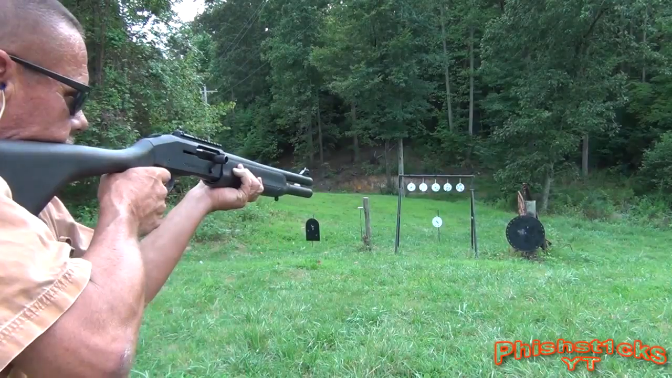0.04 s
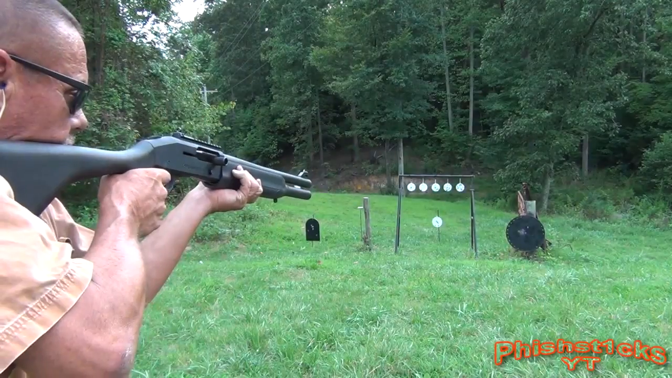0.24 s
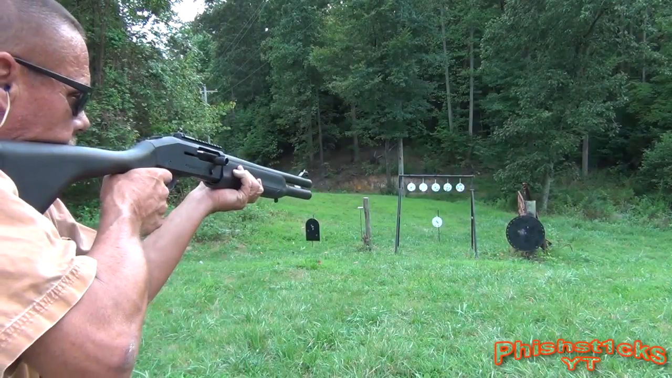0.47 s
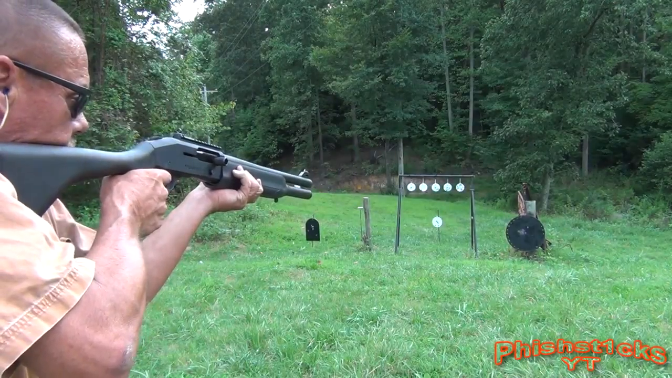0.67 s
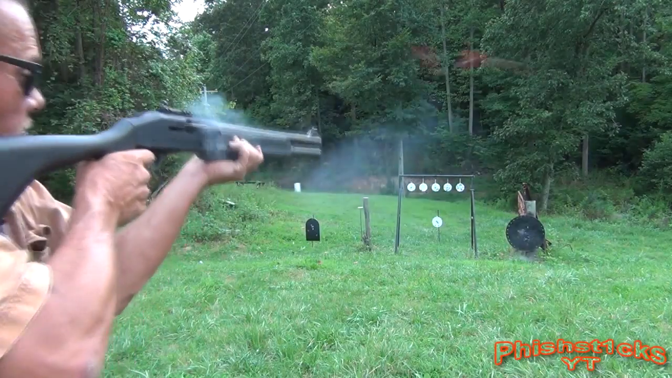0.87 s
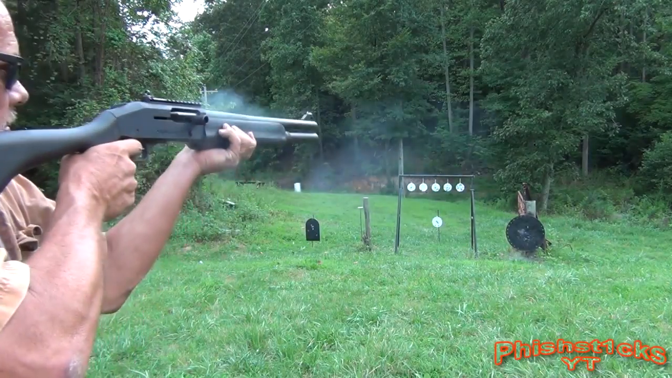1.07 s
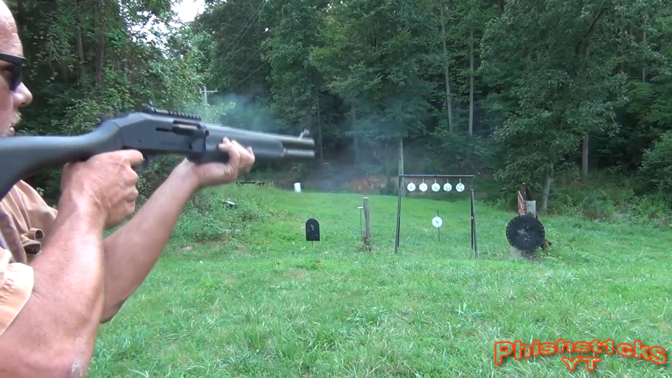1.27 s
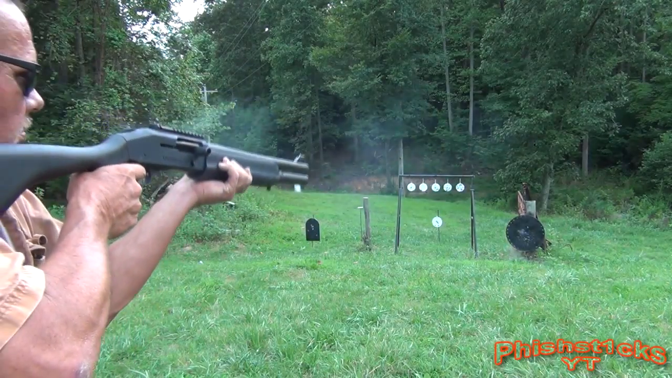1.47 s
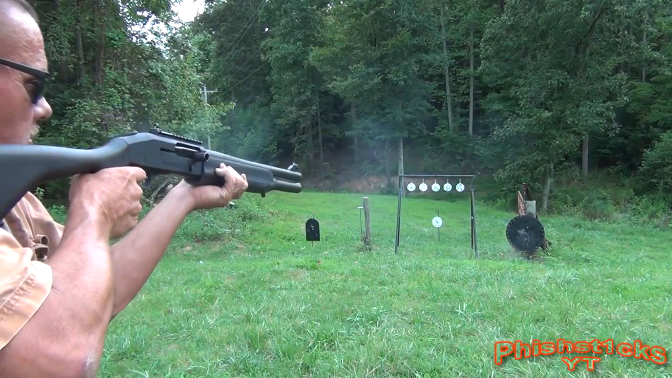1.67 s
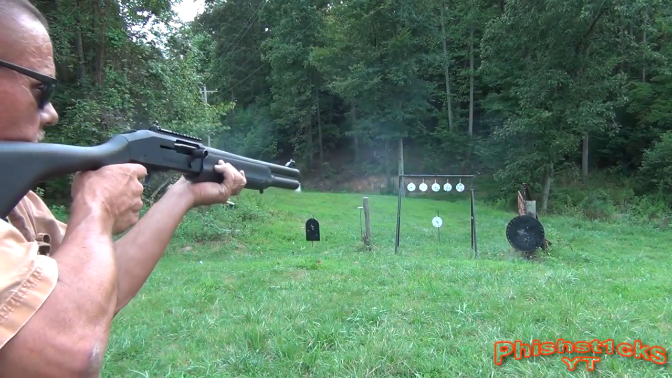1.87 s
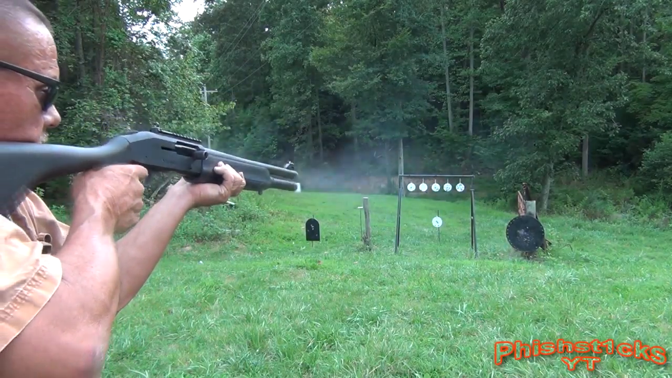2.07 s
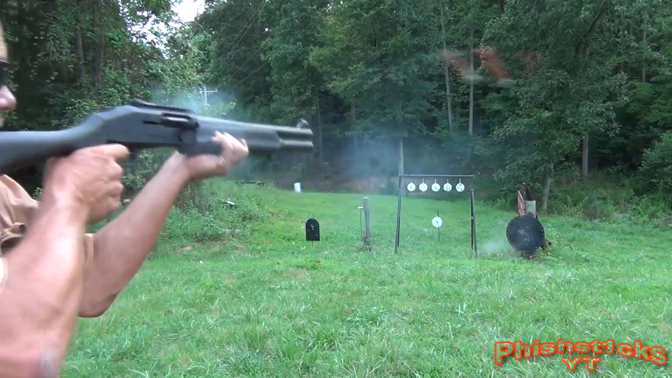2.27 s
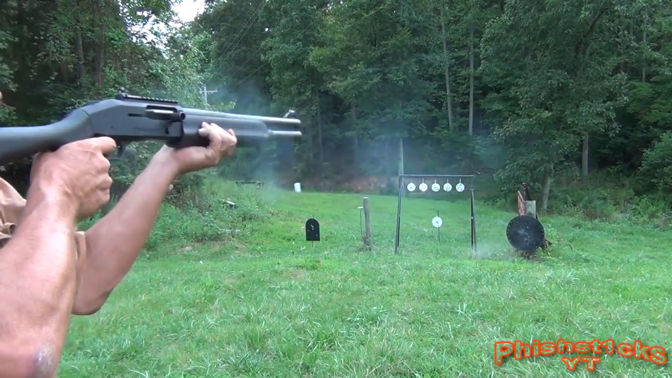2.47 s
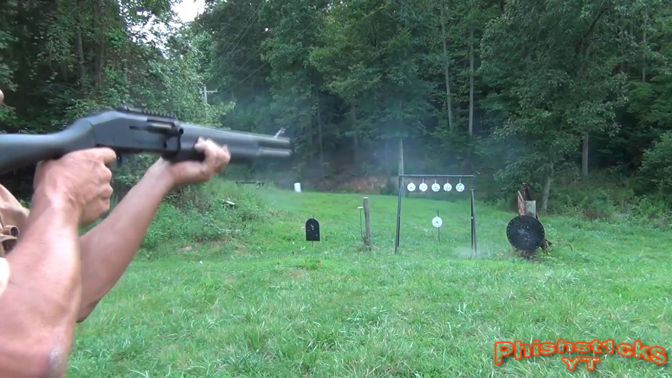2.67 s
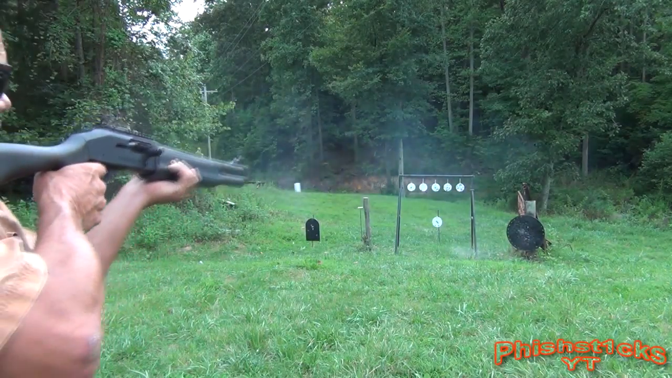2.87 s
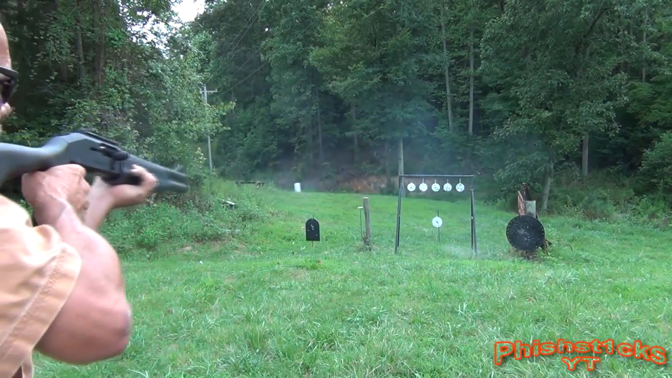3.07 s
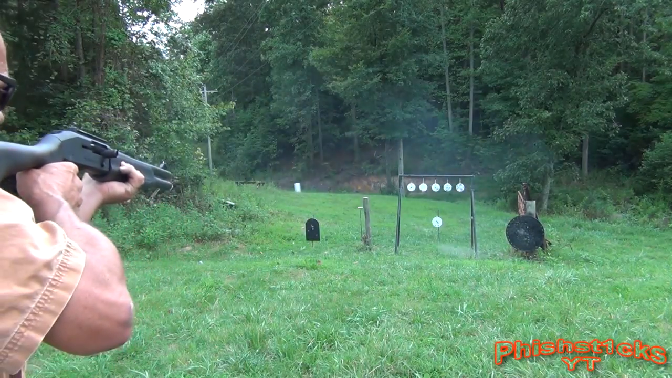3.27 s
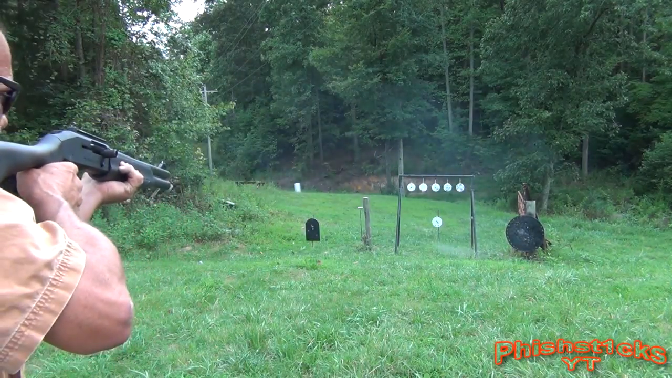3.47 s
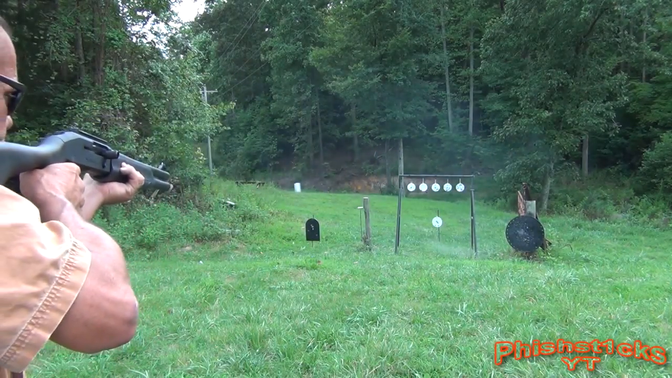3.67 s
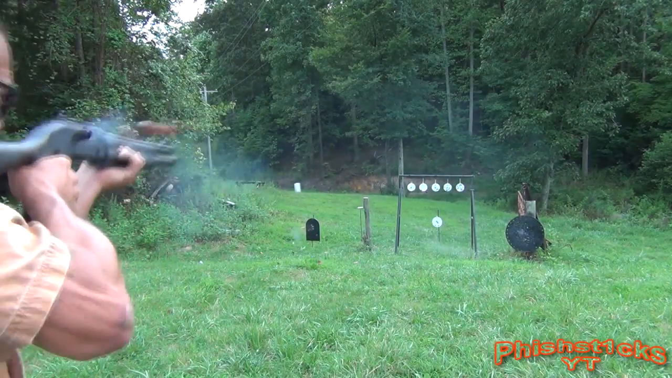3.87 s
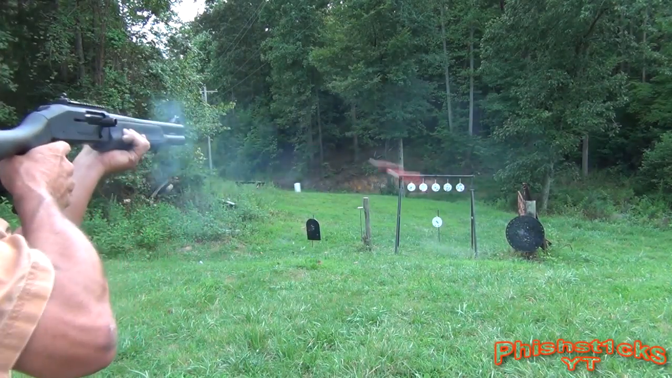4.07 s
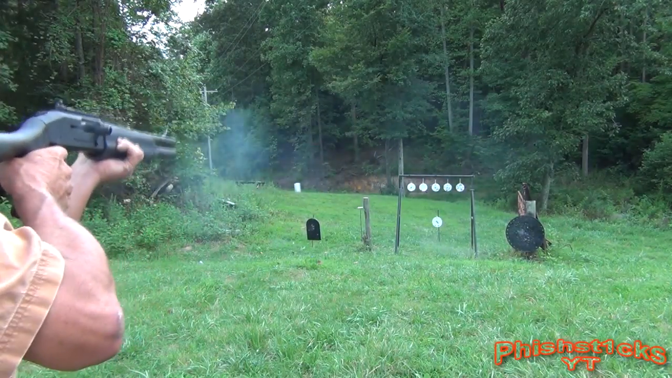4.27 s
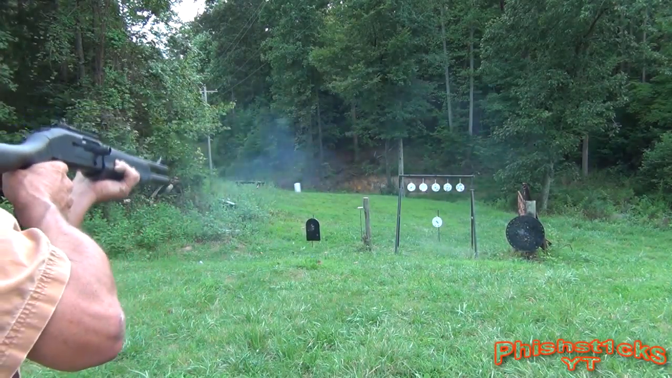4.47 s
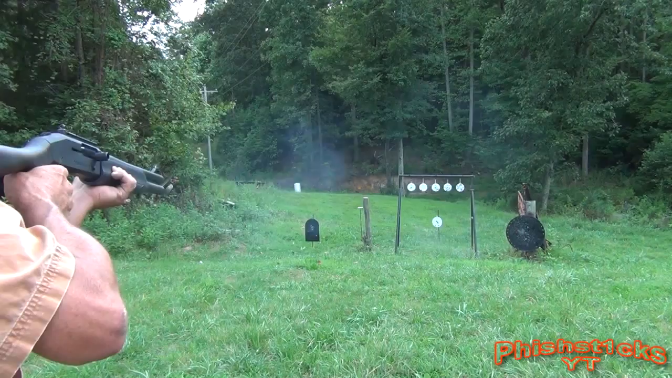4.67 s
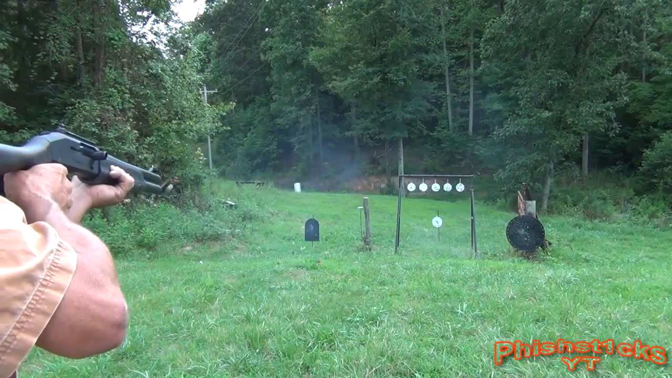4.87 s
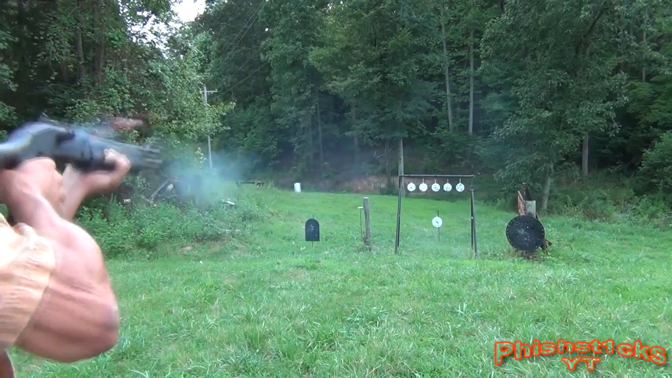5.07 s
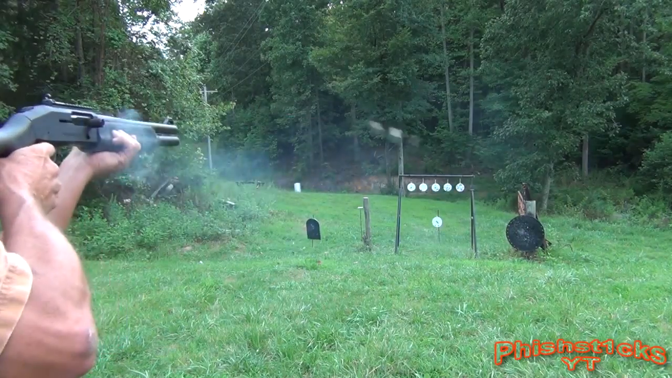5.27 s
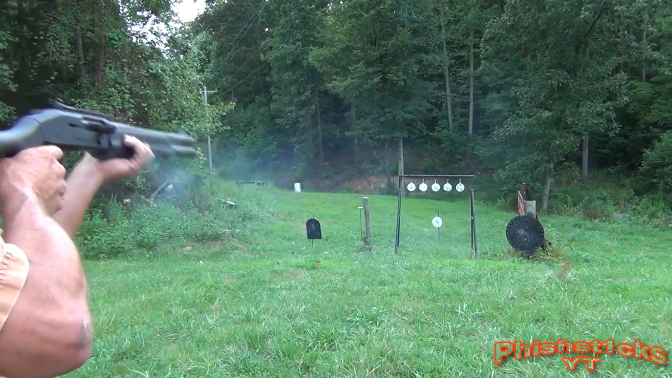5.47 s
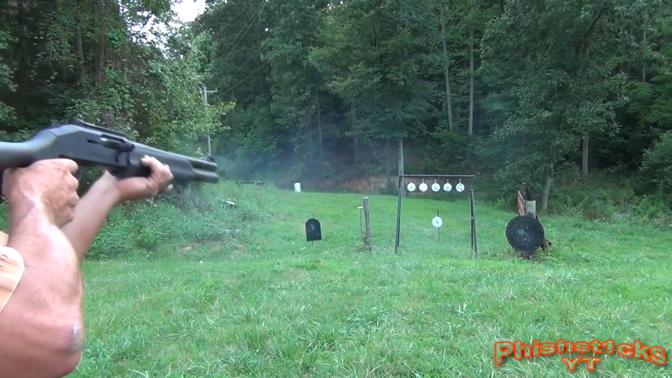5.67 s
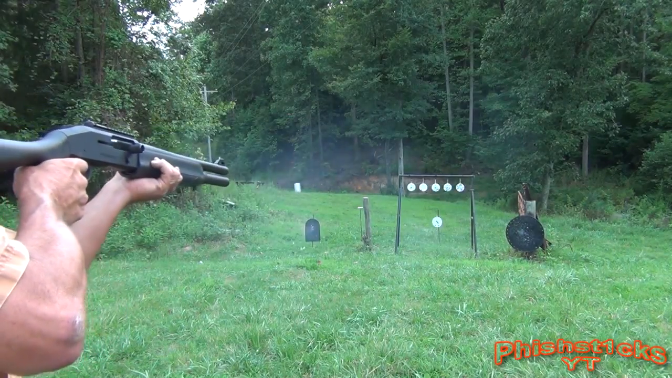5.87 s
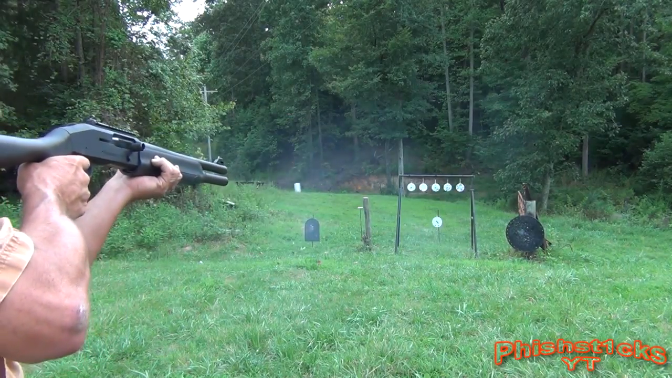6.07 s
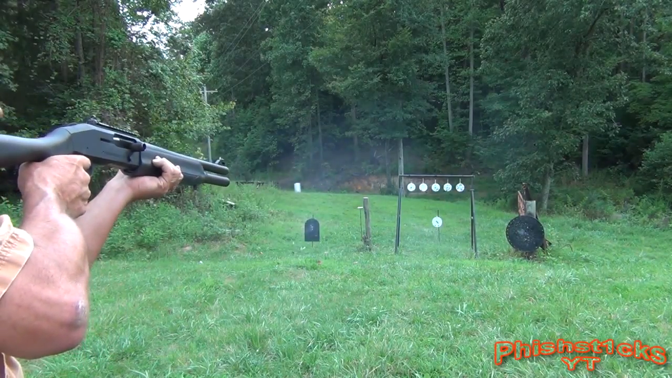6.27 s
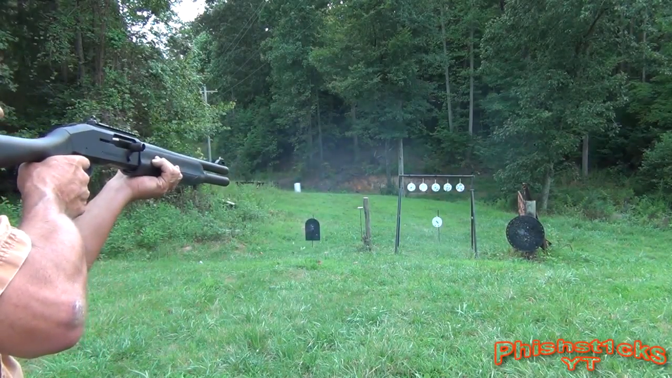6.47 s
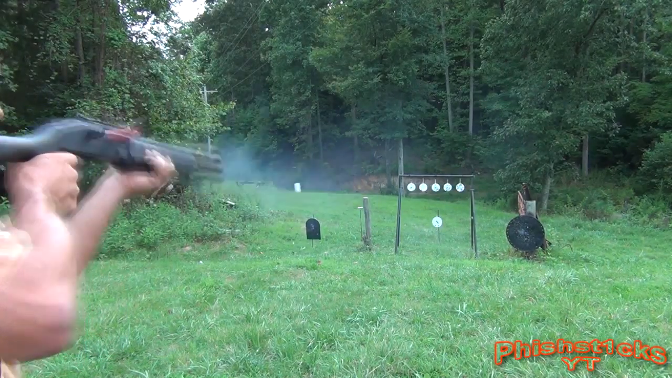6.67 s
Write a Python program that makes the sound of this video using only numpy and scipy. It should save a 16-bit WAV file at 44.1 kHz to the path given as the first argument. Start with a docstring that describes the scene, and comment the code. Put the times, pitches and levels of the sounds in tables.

```python
"""Four shotgun shots at steel targets in a clearing: filtered noise bursts, each after a faint hammer fall.
Lead slaps a plate (short noise) and the plate rings (fluttering sines and comb-filtered noise).
Trees return hard echoes (noise puffs) and a long roll (noise losing treble with delay).
Action clacks are short noise; leaves hiss and insects sing in pulsing noise bands behind.
Automatic gain ducks at loud sounds and creeps back."""
import sys
import numpy as np
from scipy import signal
from scipy.fft import rfft, irfft, next_fast_len
from scipy.io import wavfile
from scipy.ndimage import uniform_filter1d

SR = 44100
rng = np.random.default_rng(int(sys.argv[2]) if len(sys.argv) > 2 else 0)


def wav_record(signal):
    """Record a signal, one row per channel, as 16-bit PCM in the file named by sys.argv[1]."""
    frames = np.transpose(np.atleast_2d(signal))
    bounded = np.clip(frames, -1, 1)
    # unit amplitude maps onto the largest positive 16-bit level
    quanta = np.round(bounded * 32767).astype(np.int16)
    wavfile.write(sys.argv[1], SR, quanta)


N = 297234

# Levels are ahead of the gain control; spectra are levels per Hz unless noted.
# shots: t/s, blast level/dB, near scatter level/dB, woods level/dB, target (0 round plate, 1 small plate)
SHOTS = [(0.801, 5, -4, -2, 0), (2.176, 5.1, -5, -3.5, 0), (3.9023, 4.2, -8.5, -7.5, 1),
         (5.12, 4, -9, -11, 1)]
# muzzle blast spectrum: f/Hz, level/dB
BLAST_SPECTRUM = [(25, -24), (45, -22), (100, -22), (250, -4), (500, -2), (1200, 1.5), (2500, -1),
                  (5000, -3), (9000, -1.5), (13000, -4), (16000, -15)]
# large reflectors: delay/s, level/dB aiming at round plate, level/dB aiming at small plate
ECHOES = [(0.0733, 9, 7.5), (0.0803, 8, 0.5), (.1805, 10, 0), (0.2541, 12, 7), (0.2689, 4, 5.5),
          (0.286, 4, -5), (.3266, 11, -1), (.342, 12, 7.5), (0.3602, 5.5, 4.5), (0.3844, 6, -4),
          (0.4343, 3, 1.5)]
# dull thud of a hard echo: f/Hz, level/dB
ECHO_SPECTRUM = [(25, -39), (60, -34.5), (120, -17.5), (250, -9), (450, -5), (800, 0.5), (1150, -2.5),
                 (1700, -10.5), (3000, -14.5), (6000, -28), (16000, -51)]
# grass and near trees, also the bright part of a hard echo: f/Hz, level/dB
NEAR_SPECTRUM = [(25, -33), (45, -24.5), (100, -17.5), (250, -2), (500, 1.5), (1100, 4), (2000, 3.5),
                 (4000, 0), (8000, -3.5), (12000, -8), (16000, -25)]
# deep woods: f/Hz, level/dB
WOODS_SPECTRUM = [(25, -43), (50, -34.5), (90, -25), (160, -22.5), (260, -13.5), (370, 0.5), (500, 6.5),
                  (650, -0.5), (950, 1), (1300, -1), (1700, -2), (3000, -7), (5000, -14), (9000, -22),
                  (15000, -44)]
# air absorption: f/Hz, loss/(dB per s of travel)
AIR_LOSS = [(40, 18.5), (120, 12), (300, -4.5), (450, -2.5), (1000, 0), (2000, 9.5), (4000, 22.5),
            (8000, 37.5), (16000, 65)]
# wooded bank behind the round plate, before its pitch shift: f/Hz, level/dB
SURGE_SPECTRUM = [(30, -42.5), (150, -30.5), (350, -13.5), (600, 0.5), (820, 7.5), (1050, 0.5), (1400, -10),
                  (2500, -16), (6000, -28.5), (16000, -51.5)]
# scattered sound of near trees, woods, bank: level/dB, full level at delay/s, rise/s, held until delay/s,
# sag/(dB per s), fall/(dB per s)
NEAR_SWELL = (3, .086, .018, .26, 27, 105)
WOODS_SWELL = (-0.27, 0.2877, .06, 0.45, 1, 30)
SURGE_SWELL = (-2.5, .305, 0.3, 0.4, 3.5, 125)
# lead on the plates: t/s, level/dB, fade time constant/s
SLAPS = [(.877, 10.5, 0.0028), (2.25, 9.5, .004), (3.9836, 9.5, 0.0047), (5.2035, 10, 0.0044)]
# action clacks and ticks: t/s, level/dB, fade time constant/s
CLACKS = [(.931, 3, .005), (1.597, -38.5, .002), (2.309, 7.5, 0.0064), (2.945, -36, 0.0022),
          (3.306, -44, .002), (4.025, 1, 0.0054), (5.246, 0, 0.0048)]
# slaps and clacks: f/Hz, level/dB
METAL_SPECTRUM = [(100, -26), (1000, -10.5), (3000, -0.5), (6000, -7), (8500, -1), (12000, -4.5),
                  (16000, -16)]
# round plate modes: f/Hz, level/dB, t60/s
ROUND_PLATE = [(187.3, -26, 3.14), (9200, -27.5, .5), (11200, -19, .6), (12600, -21, .5)]
# small plate modes, struck at two spots: f/Hz, level/dB first hit, level/dB second hit
SMALL_PLATE = [(4480, -23, -31), (5103, -28, -21), (5523, -23, -20), (5922, -24, -17), (6288, -26, -18),
               (6714, -17, -9), (6799, -15, -20), (6853, -22, -15), (7211, -26, -21), (7378, -26, -20),
               (7660, -16, -23), (7773, -16, -20), (8008, -20, -21), (8560, -21, -21), (8845, -18, -23),
               (9408, -8, -18), (10363, -19, -25), (10490, -18, -19), (10750, -21, -23), (11133, -21, -25),
               (11420, -14, -14), (11620, -17, -23), (13700, -26, -28)]
# small plate swing per hit, values at RING_HZ: ring level/dB, facing level/dB, facing delay/s,
# sweep width (Gaussian sigma)/s, decay/(dB per s)
SWINGS = [(-4, 4.5, .078, .057, 42), (-7, 4.5, 0.092, 0.032, 56)]
# earlier sweep of high modes, which beam narrowly, one per hit: lead/(s per octave above RING_HZ)
BEAM_LEADS = [.02, 0.055]
# side signal against mid: f/Hz, level/dB
WIDTH = [(60, -30), (150, -34.5), (350, -32.5), (700, -16.5), (1400, -15), (3000, -13), (6000, -11.5),
         (11000, -21), (15000, -30.5)]
# breeze in the leaves: f/Hz, level/dB
LEAVES_SPECTRUM = [(18, -47.5), (30, -20), (145, -4.5), (184, -12.5), (364, 0), (822, 1), (1160, -2.5),
                   (2900, -13), (3770, -12), (4530, -15.5), (5170, -15.5), (7270, -8), (9460, -17.5),
                   (14800, -16.5), (16000, -22.5)]
# insects: start t/s, end t/s, f/Hz, width/Hz, level/dB, pulses/(per s), pulse depth (0-1)
INSECTS = [(0, 2.4, 5193, 130.1, -74, 62, 0.9), (0, 6.74, 5850, 40, -74, 3.2, .9),
           (0, 6.74, 7120, 756, -71, .6, 0.2), (5.8, 6.5, 4590, 22, -75, 3.3, 0.4)]

TAIL_SAMPLES = 110250
# hard echo: smear grows with delay; bright splinter against thud
SMEAR_START_S, SMEAR_S_PER_S, SPLINTER_DB = 0.0008, 0.0017, -18
# echoes from single trunks
TRUNK_COUNT, TRUNKS_FROM_S, TRUNKS_TO_S = 12, 0.095, 0.46
TRUNK_DB, TRUNK_SPREAD_DB = -3.5, 2
EARLY_DB = -28  # scattered sound before its rise, against full level
# bank roar: start pitch shift, then sinking between two delays
SURGE_START_OCT, SURGE_SAG_OCT_PER_S = 0.23, 7.3
SURGE_SAG_FROM_S, SURGE_SAG_TO_S = 0.31, 0.414
# small plate: reference pitch, decay-rate exponent, facing swell tilt, added damping of the hanger
RING_HZ, FALL_POWER, BEAM_DB_PER_OCT = 8500, 0.3, 3
RING_DAMPED_S, DAMPED_DB_PER_S = 0.57, 69
AIR_START_DB, AIR_DB_PER_S = -57.5, -0.24
EDGE_HZ = 16300


def gun():
    """Each shot sends out a blast and scattered returns; shots aimed alike wake the same echoes."""
    out, t = np.zeros((2, N)), np.arange(SR) / SR
    fields = [(hard_echoes(target), woods()) for target in (0, 1)]
    bank = surge()
    for s, blast_db, near_db, woods_db, target in SHOTS:
        lock_time_s, bang = blast()
        echoes, roll = fields[round(target)]
        near = colour(noise(SR, lumpy_db=1.5), NEAR_SPECTRUM) * swell(t, *NEAR_SWELL)
        add(out, s - lock_time_s, amp(blast_db) * bang)
        add(out, s, amp(near_db) * near)
        add(out, s, (1 - round(target)) * bank)  # round plate only
        add(out, s, echoes + amp(woods_db) * roll)
    return out


def blast(t60_s=0.5, rise_s=0.00023, hammer_db=-23, lock_time_s=0.006):
    """The hammer falls, then, lock_time_s later, the muzzle blast tears out as decaying noise."""
    t = np.arange(SR // 2) / SR
    out = np.zeros((2, len(t)))
    add(out, 0, amp(hammer_db) * burst(0.0025))
    envelope = (1 - np.exp(-t / rise_s)) * amp(-60 * t / t60_s)
    add(out, lock_time_s, noise(len(t), lumpy_db=-1.5) * envelope)
    return lock_time_s, colour(out, BLAST_SPECTRUM)


def hard_echoes(target, size=2048, energy_s=0.002, bass_hz=240, bass_db=-6):
    """Large reflectors and single trunks each return a dull thud with a little bright splinter."""
    out, t = np.zeros((2, TAIL_SAMPLES)), np.arange(size) / SR
    place, strength = rng.random((TRUNK_COUNT, 2)).T
    delays = TRUNKS_FROM_S + (TRUNKS_TO_S - TRUNKS_FROM_S) * (np.arange(TRUNK_COUNT) + place) / TRUNK_COUNT
    trunks = list(zip(delays, TRUNK_DB + TRUNK_SPREAD_DB * (2 * strength - 1)))
    large = [(delay, small_db if target else round_db) for delay, round_db, small_db in ECHOES]
    puff_gain = np.sqrt(energy_s * SR / size)  # thud energy: that of rms-1 noise lasting energy_s
    for delay, db in large + trunks:
        puff = t * np.exp(-t / (SMEAR_START_S + SMEAR_S_PER_S * delay))
        thud = unit(colour(noise(size) * puff, ECHO_SPECTRUM))
        splinter = unit(colour(noise(size) * puff, NEAR_SPECTRUM))
        add(out, delay, amp(db) * puff_gain * (thud + amp(SPLINTER_DB) * splinter))
    bass_cut = signal.butter(N=2, Wn=bass_hz, btype="high", fs=SR)
    body = signal.lfilter(*bass_cut, out)
    return body + amp(bass_db) * (out - body)  # long waves mostly pass round the reflectors


def woods(tree_line_s=0.33, lumpy_db=0.5, blend_s=0.96):
    """Countless trunks scatter the blast; longer paths give a smoother roll and lose more treble to the air."""
    delay = np.arange(TAIL_SAMPLES) / SR
    lumps_db = lumpy_db * np.exp(-np.maximum(delay - tree_line_s, 0) / blend_s)
    hz, t, z = signal.stft(noise(TAIL_SAMPLES, lumps_db), SR, nperseg=512)
    z = z * amp(-at_hz(AIR_LOSS, hz)[:, None] * np.maximum(t - tree_line_s, 0))
    roll = signal.istft(z, SR, nperseg=512)[1][:, :TAIL_SAMPLES]
    return colour(roll, WOODS_SPECTRUM) * swell(delay, *WOODS_SWELL)


def surge(lumpy_db=4):
    """The wooded bank returns a dense roar whose pitch sinks as deeper ranks of trees answer."""
    hz, t, z = signal.stft(noise(SR, lumpy_db), SR, nperseg=512)
    sag_s = np.clip(t - SURGE_SAG_FROM_S, 0, SURGE_SAG_TO_S - SURGE_SAG_FROM_S)
    octaves = SURGE_START_OCT - SURGE_SAG_OCT_PER_S * sag_s
    tone = amp(at_hz(SURGE_SPECTRUM, hz[:, None] / 2 ** octaves))
    tone = tone / np.sqrt(np.mean(tone ** 2, axis=0))
    roar = signal.istft(z * tone, SR, nperseg=512)[1][:, :SR]
    return roar * swell(np.arange(SR) / SR, *SURGE_SWELL)


def swell(t, db, arrive_s, rise_s, hold_s, sag_db_per_s, fall_db_per_s):
    """Scatter is faint until the wave reaches the scatterers, then rises, sags in a hold and falls steadily."""
    rise_db = EARLY_DB * np.clip((arrive_s - t) / rise_s, 0, 1)
    sag_db = sag_db_per_s * np.clip(t - arrive_s, 0, hold_s - arrive_s)
    return amp(db + rise_db - sag_db - fall_db_per_s * np.maximum(t - hold_s, 0))


def metal_knocks(knocks):
    """Lead on steel, or the action's parts, knock as short noise with exponential fade."""
    out = np.zeros((2, N))
    for s, db, fade_s in knocks:
        add(out, s, amp(db) * colour(burst(fade_s), METAL_SPECTRUM))
    return out


def round_plate(shimmer_db=-10, shimmer_t60_s=0.87):
    """The heavy round plate hums in one slow-decaying low mode; a few high modes and a shimmer fade within a
    second."""
    out, long, t = np.zeros((2, N)), np.arange(TAIL_SAMPLES) / SR, np.arange(SR) / SR
    for (s, _, _), (next_s, _, _) in zip(SLAPS[:2], SLAPS[1:]):
        until_next = np.clip((next_s - s - long) / 0.02, 0, 1)  # hum ends at the next slap
        add(out, s, amp(shimmer_db - 60 * t / shimmer_t60_s) * shimmer(4000, 13000, count=50))
        for hz, db, t60_s in ROUND_PLATE:
            add(out, s, amp(db - 60 * long / t60_s) * until_next * partial(hz, long, flutter=0.08))
    return out


def small_plate(shimmer_db=-15.0, tilt_db_per_band=-2):
    """The small plate rings in many high modes that swell as it swings on its hanger."""
    out, t = np.zeros((2, N)), np.arange(SR) / SR
    edges = np.geomspace(5600, 15500, 5)
    for hit, (motion, lead) in enumerate(zip(SWINGS, BEAM_LEADS)):
        s = SLAPS[2 + hit][0]
        voices = [(hz, amp(levels[hit]) * partial(hz, t, flutter=0.72)) for hz, *levels in SMALL_PLATE]
        for band, (low, high) in enumerate(zip(edges, edges[1:])):
            crowd = amp(shimmer_db + tilt_db_per_band * band) * shimmer(low, high, count=12)
            voices.append((np.sqrt(low * high), crowd))
        for hz, voice in voices:
            add(out, s, voice * swing(t, hz, lead, *motion))
    return out


def partial(hz, t, flutter, flutter_rate_hz=16, spread=0.15):
    """One plate mode, fluttering unevenly in level and phase as the plate shakes on its hanger."""
    phase, pan = rng.random(2)
    knots = rng.standard_normal((2, 128))
    in_phase, quadrature = [np.interp(t * flutter_rate_hz, np.arange(knots.shape[1]), k) for k in knots]
    turn = 2 * np.pi * (hz * t + phase)
    tone = (1 + flutter * in_phase) * np.sin(turn) + flutter * quadrature * np.cos(turn)
    tone = tone / np.sqrt(0.5 + flutter ** 2)
    return tone * (1 + spread * (2 * pan - 1) * np.array([[1], [-1]]))


def shimmer(low_hz, high_hz, count=30, width_hz=9):
    """The crowd of weak high modes of a steel plate: noise through a comb of resonances, 1 s long."""
    f = np.fft.rfftfreq(SR, 1 / SR)
    modes = low_hz + (high_hz - low_hz) * (np.arange(count) + rng.random(count)) / count
    comb = sum(1 / (1 + ((f - hz) / width_hz) ** 2) for hz in modes)
    return unit(irfft(rfft(noise(SR)) * comb, SR))


def swing(t, hz, lead_s_per_oct, ring_db, facing_db, facing_s, sweep_s, fall_db_per_s):
    """A small-plate mode decays, then faster by hanger damping; it swells as the face sweeps past."""
    octaves = np.log2(hz / RING_HZ)
    fall_db = fall_db_per_s * (hz / RING_HZ) ** FALL_POWER * t
    fall_db = fall_db + DAMPED_DB_PER_S * np.maximum(t - RING_DAMPED_S, 0)
    beam = np.exp(-0.5 * ((t + lead_s_per_oct * octaves - facing_s) / sweep_s) ** 2)
    return amp(ring_db - fall_db) + amp(facing_db + BEAM_DB_PER_OCT * octaves) * beam


def meadow():
    """A slowly dropping breeze in the leaves, and insects as pulsing narrow bands of noise."""
    size = next_fast_len(N)
    t, f, hiss = np.arange(N) / SR, np.fft.rfftfreq(size, 1 / SR), rfft(noise(size))
    air = amp(AIR_START_DB + AIR_DB_PER_S * t) * colour(noise(N, lumpy_db=1.2), LEAVES_SPECTRUM)
    for start_s, end_s, hz, width_hz, db, rate_hz, depth in INSECTS:
        band = np.exp(-0.5 * ((f - hz) / width_hz) ** 2)
        song = unit(irfft(hiss * band, size)[:, :N])
        singing = np.clip(np.minimum(t - start_s, end_s - t) / 0.091 + 1, 0, 1)
        pulses = 1 + depth * np.sin(2 * np.pi * (rate_hz * t + rng.random()))
        air = air + amp(db) * song * singing * pulses
    return air


def burst(fade_s, count=8192):
    """A puff of noise that dies away exponentially."""
    return noise(count) * np.exp(-np.arange(count) / SR / fade_s)


def noise(count, lumpy_db=0):
    """White noise at two close microphones; lumpy_db makes it arrive in clumps."""
    mid, side, lumps = rng.standard_normal((3, count))
    size = next_fast_len(count)
    side_gain = amp(at_hz(WIDTH, np.fft.rfftfreq(size, 1 / SR)))
    side = irfft(rfft(side, size) * side_gain, size)[:count]
    clumps = amp(lumpy_db * unit(uniform_filter1d(lumps, size=110)))
    return unit(np.array([mid + side, mid - side]) * clumps)


def colour(x, points, size=4096):
    """Causal minimum-phase filter with the given spectrum; keeps the power of white noise."""
    log_gain = np.log(amp(at_hz(points, abs(np.fft.fftfreq(size, 1 / SR)))))
    taps = np.fft.ifft(np.exp(np.conj(signal.hilbert(log_gain)))).real[:size // 2]
    return signal.fftconvolve(x, taps[None] / np.linalg.norm(taps), axes=1)[:, :x.shape[1]]


def at_hz(points, hz):
    """Reads a spectrum on a log-frequency axis."""
    f, value = np.transpose(points)
    return np.interp(np.log(hz + 1), np.log(f + 1), value)


def add(mix, s, sound):
    """Mixes a sound in at time s, cut at the end of the mix."""
    part = mix[:, round(s * SR):][:, :sound.shape[-1]]
    part += sound[..., :part.shape[1]]


def amp(db):
    """Decibels to gain."""
    return 10 ** (np.asarray(db) / 20)


def unit(x):
    """Scales to rms 1."""
    return x / np.sqrt(np.mean(x ** 2) + 1e-20)


def scene():
    """Gun, slaps and clacks, plates, meadow."""
    knocks = metal_knocks(SLAPS) + metal_knocks(CLACKS)
    return gun() + knocks + round_plate() + small_plate() + meadow()


def record(dry, threshold_db=-30, squeeze=0.46, envelope_fall_db_per_s=15, ceiling=1.0):
    """Gain dives at loud sounds and creeps back; peaks are rounded off; then the band limit."""
    power_db = 10 * np.log10(abs(uniform_filter1d((dry ** 2).mean(0), size=440)) + 1e-12)
    creep_db = np.arange(N) * envelope_fall_db_per_s / SR
    envelope_db = np.maximum.accumulate(power_db + creep_db) - creep_db  # instant rise, steady fall
    over_db = np.maximum(envelope_db - threshold_db, 0)
    gain = amp(-squeeze * uniform_filter1d(over_db, size=60))
    held = ceiling * np.tanh(dry * gain / ceiling)
    low_pass = signal.firwin(255, EDGE_HZ, window=("kaiser", 9), fs=SR)
    return signal.oaconvolve(held, low_pass[None], "same")


dry = scene()
out = record(dry)
wav_record(out)
```